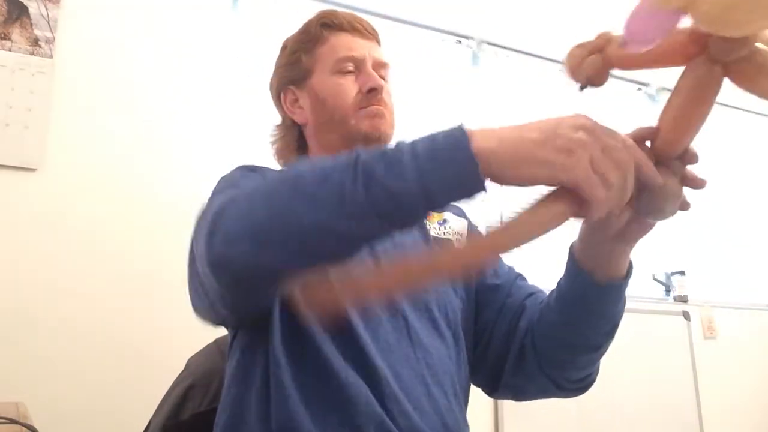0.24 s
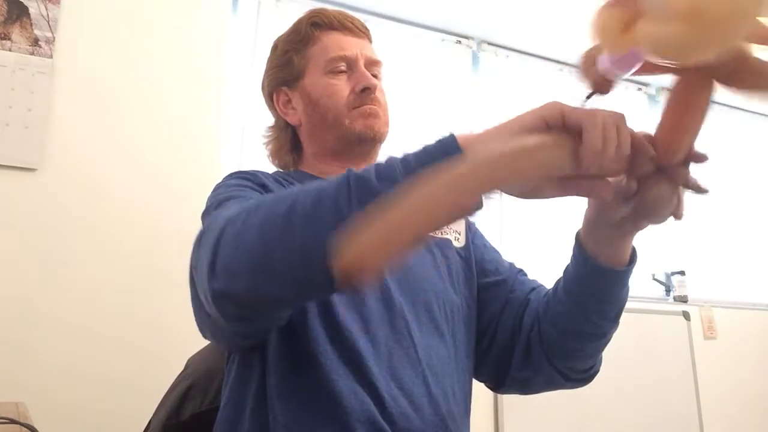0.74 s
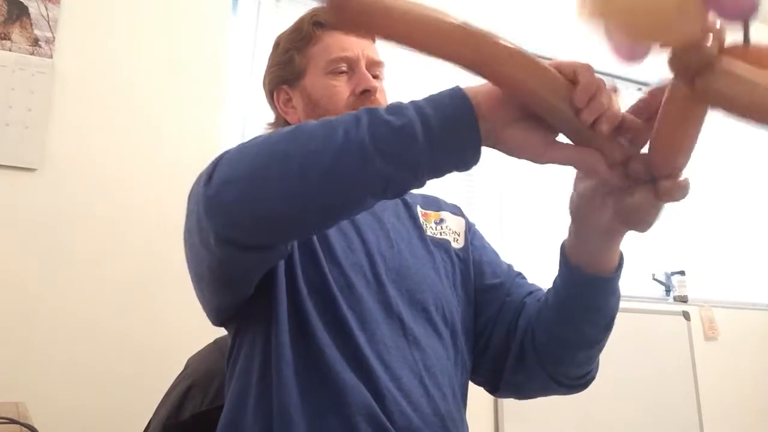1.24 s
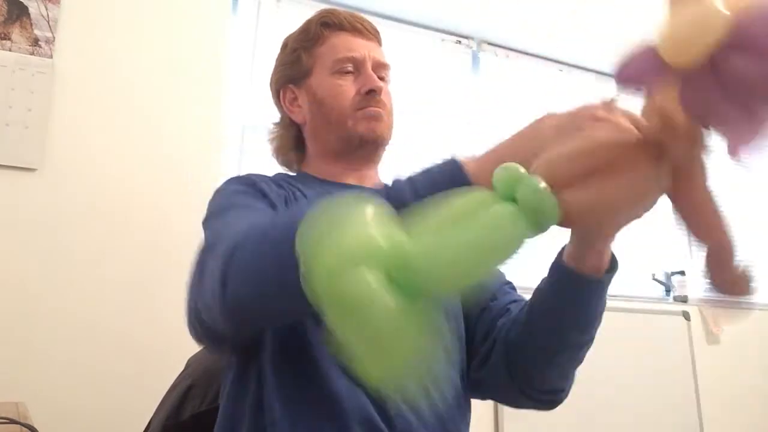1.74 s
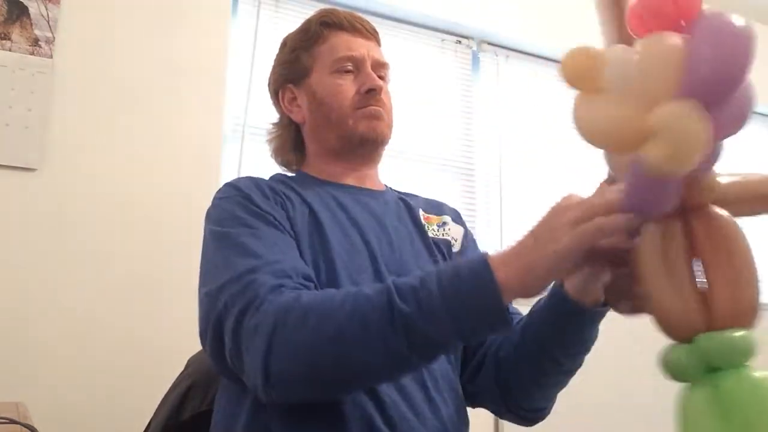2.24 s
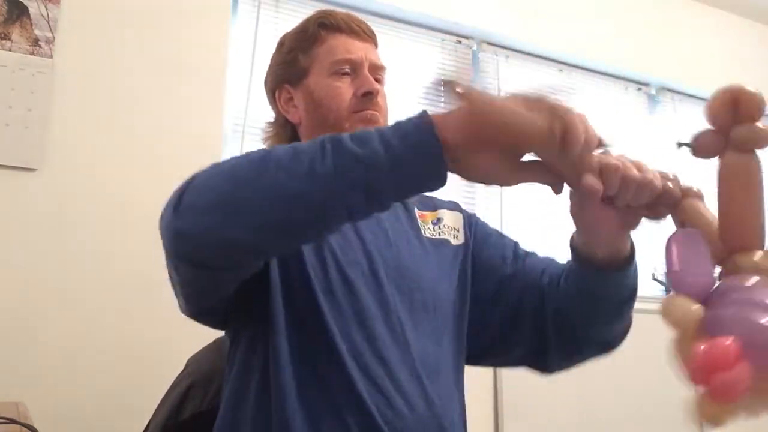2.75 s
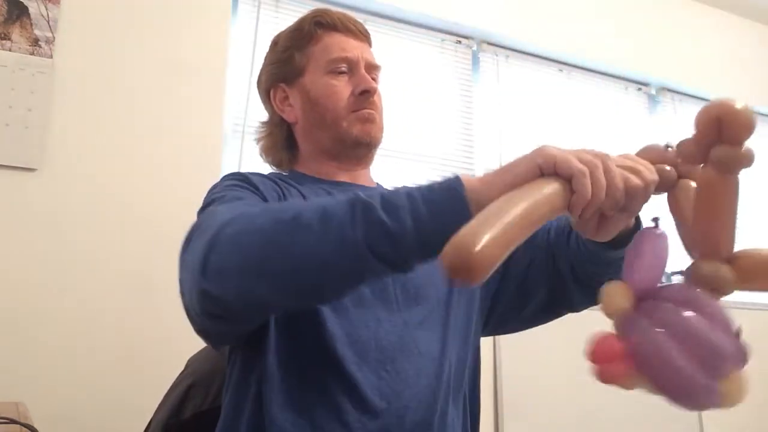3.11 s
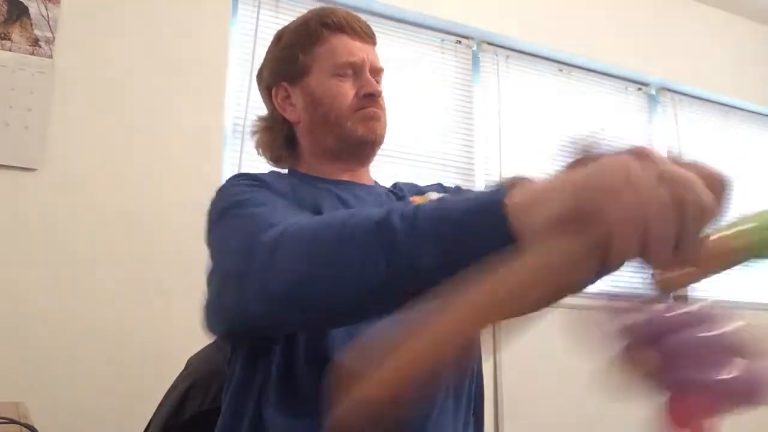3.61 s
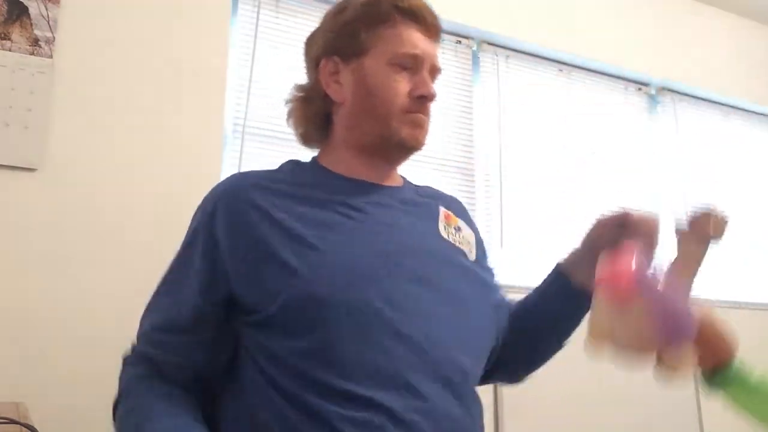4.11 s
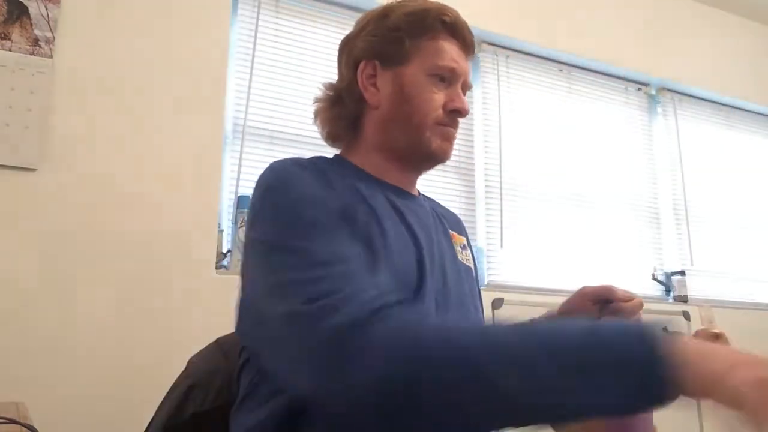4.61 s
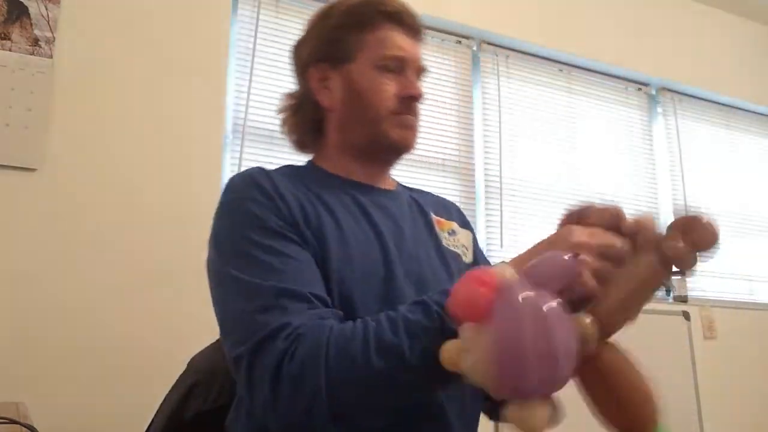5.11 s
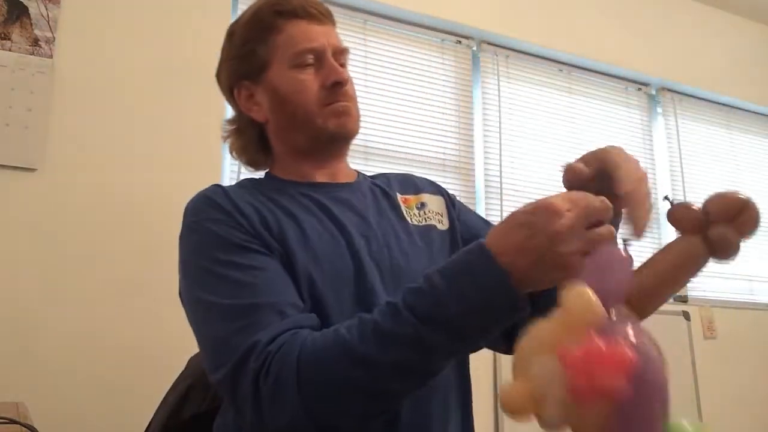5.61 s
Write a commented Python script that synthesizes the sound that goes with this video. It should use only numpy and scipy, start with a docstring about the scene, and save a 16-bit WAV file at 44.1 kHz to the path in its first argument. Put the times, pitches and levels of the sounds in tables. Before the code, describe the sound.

Balloon twisting heard by a nearby microphone indoors: gritty, hissing hand strokes with tiny clicks and dull air-filled knocks, strongest around one and two seconds. Past the middle come a sharp snap, a quick falling squeal, a heavy thump and a rough rubbery squawk, all ringing briefly in the room. Quiet rubs, ticks and one short croak finish it over faint room noise.

```python
"""In a small, bare room, long latex balloons are twisted by hand.
Skin on latex makes dense tiny slips that ring the balloons, with ticks, squeaks and hollow bumps between.
Stretched latex snaps in short noise bursts, and a taut neck squeals downward as a falling near-sine
and lets go with a thump. Then balloon grips balloon: a slip in every cycle makes
a rough squawk and, at the end, short croaks."""
import sys
import numpy as np
from scipy import signal
from scipy.fft import rfft, irfft
from scipy.io import wavfile

SR = 44100
rng = np.random.default_rng(int(sys.argv[2]) if len(sys.argv) > 2 else 0)


def inscribe(sig):
    """Save sig as 16-bit PCM at rate SR to the path in sys.argv[1].

    A 1-D sig is mono; a 2-D sig holds one channel per row.
    Samples are clipped to [-1, 1] before scaling.
    """
    pcm = np.round(np.clip(np.atleast_2d(sig).T, -1, 1) * 32767)
    wavfile.write(sys.argv[1], SR, pcm.astype(np.int16))


N = 258426
TIME = np.arange(N) / SR
TOP_HZ = 15600  # the microphone hears nothing above this

# colour of the hiss of sliding latex: f/Hz, level/dB
HISS_COLOUR = [(2500, -20), (4500, -0.5), (6000, -5.5), (8000, -4.5), (11000, -4.5), (15500, -13.5)]


def undb(db):
    """Turn decibels into a gain."""
    return 10 ** (np.asarray(db) / 20)


def unit(x):
    """Scale a sound to an rms of 1."""
    return x / np.sqrt(np.mean(x ** 2) + 1e-20)


def add(out, s, x):
    """Mix a short sound in at time s (seconds)."""
    i = max(int(s * SR), 0)
    out[i:i + len(x)] += x[:max(N - i, 0)]


def at_hz(points, hz):
    """Read a table between its points, on a log-frequency axis."""
    f, v = np.transpose(points)
    return np.interp(np.log(hz + 1), np.log(f), v)


def ring(x, response):
    """Pass a sound through an impulse response."""
    return signal.fftconvolve(x, response)[:len(x)]


def colour(points, size=2048):
    """Make a minimum-phase response of unit energy with the given spectrum."""
    log_gain = np.log(undb(at_hz(points, np.fft.rfftfreq(size, 1 / SR))))
    cepstrum = irfft(log_gain)
    # folding the cepstrum forward in time makes the response causal
    cepstrum[1:size // 2] *= 2
    cepstrum[size // 2 + 1:] = 0
    h = irfft(np.exp(rfft(cepstrum)))
    return h / np.linalg.norm(h)


def band(x, hz, width):
    """Two-pole band-pass with a gain of 1 at its centre."""
    g = np.tan(np.pi * min(hz, TOP_HZ) / SR)
    k = width / hz
    top = [g * k, 0, -g * k]
    bottom = [1 + g * k + g * g, 2 * g * g - 2, 1 - g * k + g * g]
    return signal.lfilter(top, bottom, x)


def fade(t60):
    """Exponential decay that reaches -60 dB after t60 seconds."""
    t = np.arange(int(t60 * SR) + 8) / SR
    return np.exp(-np.log(1000) * t / t60)


def envelope(s, length, attack, release):
    """Rise from time s, hold until the length is over, then die away."""
    rise = np.clip((TIME - s) / attack, 0, 1)
    return rise * np.exp(-np.clip((TIME - s - length) / release, 0, 30))


def walk(rate):
    """Random wandering of rms 1, with a new target rate times a second."""
    return unit(np.interp(TIME * rate, np.arange(N), rng.standard_normal(N)))


def mode(hz, t60):
    """One damped vibration, with a soft start over its first cycle or so."""
    decay = fade(t60)
    cycles = hz * np.arange(len(decay)) / SR
    return decay * np.sin(2 * np.pi * cycles) * (1 - np.exp(-2 * cycles))


def crack(noise, t60, hz, width):
    """One sudden slip: a step of the skin and a fast-dying flutter; peak 1."""
    decay = fade(t60)[:len(noise)]
    push = noise[:len(decay)] * decay
    push[0] = 5.73  # the step
    x = band(push, hz, width)
    return x / np.abs(x).max()


def background():
    """The quiet of the room as coloured noise, with a faint low hum that comes and goes."""
    # f/Hz, level/dB
    quiet_colour = [(25, -9.5), (60, -8.5), (120, -8.5), (180, -10.5), (500, -15), (1500, -22.5),
                    (5000, -21), (15000, -29.5)]
    swell = undb(-63) * envelope(.15, .73, attack=.1, release=.1)
    hum = unit(band(band(rng.standard_normal(N), 107.6, 8.8), 107.6, 8.8))
    quiet = ring(rng.standard_normal(N), colour(quiet_colour))
    return undb(-60) * quiet + swell * hum


def hand_strokes():
    """Gains of rasp, hollow body and hiss: each stroke rises, holds and fades as the pressure wavers."""
    # strokes of a hand over latex, before the pressure and the trims of the rubbing:
    # start t/s, length t/s, rasp level/dB, hollow body level/dB re rasp, hiss level/dB re rasp
    strokes = [(0, 0.14, -52.5, -2, -1.5), (0.164, 0.25, -51, -8.5, -3), (0.442, 0.22, -53.5, -3.5, -2),
               (0.57, 0.094, -49, -10, -2.5), (0.663, 0.048, -41, -16, -10), (0.726, .17, -49, -11.5, -4),
               (0.915, 0.068, -40, -17, -3.5), (0.99, .14, -41, -6, -3), (1.155, 0.16, -53.5, -2, -1.5),
               (1.38, 0.24, -48.5, -1, -3), (1.566, 0.38, -44.5, -3.5, -6), (1.982, .045, -36.5, -3, -11),
               (2.027, 0.3, -45.5, -7, -4.5), (2.238, 0.25, -45, -7, -4.5), (2.491, 0.13, -58, -2.5, -2),
               (2.76, 0.16, -49, -10, -3.5), (2.852, 0.16, -47, -9.5, -6), (3.046, 0.2, -55, -17, -2),
               (3.256, 0.13, -55.5, -17, -6), (4, 0.39, -52.5, 0.5, -2), (4.59, 0.22, -52.5, -20, -8.5),
               (4.781, 0.31, -51.5, -17, -12.5), (5.129, .1, -50.5, 1.5, -10),
               (5.263, 0.3, -49.5, -7.5, -12), (5.644, .14, -57, -4.5, -9), (5.827, .04, -46, -9, -11)]
    gains = np.zeros((3, N))
    for s, length, db, hollow_db, hiss_db in strokes:
        stroke = undb(db) * envelope(s, length, attack=.04, release=.026)
        gains = np.maximum(gains, np.outer(undb([0, hollow_db, hiss_db]), stroke))
    pressure_db = 1.26 * walk(16)
    return gains * undb(pressure_db)


def micro_slips(rate, spread_db):
    """A dense stream of tiny slips, rate a second, a few of them much larger than the rest."""
    sizes = undb(spread_db * np.minimum(rng.exponential(size=N), 5))
    slips_now = rng.random(N) < rate / SR
    return unit(slips_now * sizes * rng.standard_normal(N))


def catches(count, low_hz, high_hz, cycles, weak_db):
    """Brief catches of skin on latex, each a short damped vibration at a pitch of its own."""
    out = np.zeros(N)
    for when, pitch, life, size in rng.random((count, 4)):
        hz = low_hz * (high_hz / low_hz) ** pitch
        gain = undb(weak_db * np.log(size + 0.037))  # some catches are much weaker
        add(out, when * N / SR, gain * mode(hz, cycles * (0.16 + life) / hz))
    return unit(out)


def rubbing(rasp_gain, hollow_gain, hiss_gain):
    """Hands drag over latex in uneven steps: the skin rasps, catches and hisses, the air inside answers."""
    # colours of the skin's rasp and of the air inside: f/Hz, level/dB
    rasp_colour = [(260, -33), (450, -3), (808, -9), (928, 1.5), (1030, -6), (1740, 1.5), (1980, -0.5),
                   (2890, -4), (3170, -0.5), (7000, -18.5), (9100, -39), (15400, -120)]
    hollow_colour = [(40, -23), (100, -3), (170, -6), (290, 6), (450, -1.5), (600, -2), (900, -33),
                     (2000, -82.5)]
    grip = unit(undb(1.9 * walk(55) + 1.27 * walk(300)))
    slips = grip * micro_slips(rate=4000, spread_db=2.5)
    grains = grip * catches(count=3000, low_hz=650, high_hz=4700, cycles=34, weak_db=2.5)
    rasp = unit(ring(slips, colour(rasp_colour)) + undb(-6.0) * grains)
    hollow = ring(slips, colour(hollow_colour))
    hiss = ring(grip * micro_slips(rate=14000, spread_db=1.3), colour(HISS_COLOUR))
    return undb(-0.5) * rasp_gain * rasp + undb(-3.0) * hollow_gain * hollow + undb(0.55) * hiss_gain * hiss


def ticks(rasp_gain):
    """Single small slips as the grip shifts; random fainter ones follow the strength of the rubbing."""
    # the clearest slips: t/s, peak level/dB, centre f/Hz
    clear_slips = [(.002, -26.5, 625), (0.019, -28.5, 563), (.087, -25.5, 750), (.185, -27.5, 680),
                   (0.256, -35, 3150), (.295, -29, 2320), (.351, -29, 2430), (.492, -32, 1460),
                   (.663, -28, 2190), (.686, -25, 2030), (0.702, -24, 1980), (0.924, -25.5, 2960),
                   (1.129, -24.5, 500), (1.359, -34, 570), (1.54, -27.5, 950), (2.571, -32.5, 1140),
                   (2.789, -32, 11000), (4.157, -25, 3280), (4.791, -35, 1870), (5.03, -29, 860),
                   (5.297, -30.5, 1400), (5.359, -35, 1840), (5.371, -27, 537), (5.817, -33, 700)]
    t60_s = 0.035
    strays_per_s, stray_db = 33, 13.5  # highest peak re the rasp gain
    low_hz, high_hz = 500, 3200
    out, strays = np.zeros(N), np.zeros(N)
    for s, db, hz in clear_slips:
        add(out, s, undb(db) * crack(rng.standard_normal(4096), t60_s, hz, 1.86 * hz))
    for when, pitch, size in rng.random((int(strays_per_s * N / SR), 3)):
        hz = low_hz * (high_hz / low_hz) ** pitch
        slip = crack(rng.standard_normal(4096), t60_s, hz, 1.5 * hz)
        add(strays, when * N / SR, np.sqrt(size) * slip)
    return out + undb(stray_db) * rasp_gain * strays


def snaps():
    """Stretched latex lets go; returns the direct crack and the sharp pulse thrown into the room."""
    # t/s, peak level/dB, crack t60 t/s, centre f/Hz, width f/Hz, room pulse level/dB re the crack's rms
    releases = [(0.0752, -19.5, 0.0082, 3000, 9000, -18), (0.947, -15, 0.0063, 10800, 8000, -18),
                (1.994, -26, 0.021, 3500, 8000, 2), (2.78, -20, 0.015, 8400, 9100, -3),
                (3.6306, -2.5, .012, 6500, 14000, 11), (3.9059, -3.5, 0.061, 2460, 7040, 0.5),
                (4.2768, -7, 0.034, 1900, 3900, 1), (4.2949, -11, 0.037, 1190, 3000, 4),
                (5.503, -9.5, 0.027, 760, 1000, -10.5), (5.507, -17, 0.095, 7260, 9000, -0.5)]
    direct, thrown = np.zeros(N), np.zeros(N)
    for s, db, t60, hz, width, room_db in releases:
        x = undb(db) * crack(rng.standard_normal(4096), t60, hz, width)
        pulse = band(signal.unit_impulse(len(x)), hz, width)
        add(direct, s, x)
        add(thrown, s, undb(room_db) * np.std(x) * unit(pulse))
    return direct, thrown


def knock(hz, t60):
    """A nudged balloon rings in a few quickly damped modes."""
    # frequency as a multiple of hz, level/dB, share of the t60
    balloon_modes = [(0.998, -3, 0.9), (1.52, -4.5, 0.49), (2.302, -12, 0.77), (3.6, -9, 0.43)]
    out = np.zeros(int(2 * t60 * SR) + 8)
    for ratio, db, life in balloon_modes:
        x = undb(db) * mode(hz * ratio, t60 * life)[:len(out)]
        out[:len(x)] += x
    return out


def bumps(hollow_gain):
    """Clear bumps and thumps of the balloons, some of them ringing on after a snap or as the neck lets go, and
    random nudges that follow the strength of the rubbing."""
    # t/s, level/dB of the whole knock, base f/Hz of its modes, ring t60 t/s
    clear_bumps = [(0.076, -38, 101, .031), (.135, -43, 305, .25), (.187, -38, 305, 0.071),
                   (1.045, -38, 391, 0.14), (1.128, -32, 350, 0.056), (1.362, -33, 111, 0.036),
                   (1.818, -33, 210, 0.057), (2.002, -33, 274, 0.13), (2.751, -19.5, 327, 0.015),
                   (2.783, -37.5, 205, .1), (3.632, -15, 127, 0.018), (3.668, -37, 258, 0.22),
                   (3.9033, -7, 261, 0.032), (3.906, -25, 115, .17), (3.916, -10, 452, 0.016),
                   (3.946, -26, 325, .069), (4.03, -22.5, 159, 0.028), (4.035, -20, 476, 0.023),
                   (4.082, -31.5, 443, 0.053), (4.188, -35.5, 500, .079), (4.288, -10.5, 320, 0.082),
                   (4.297, -15.5, 432, 0.051), (4.301, -33, 88, 0.27), (5.174, -30, 222, 0.051),
                   (5.181, -29.5, 67, 0.09), (5.502, -17.5, 619, 0.079)]
    nudges_per_s, nudge_db, nudge_t60_s = 14, 5, 0.079  # highest level re the hollow body gain
    low_hz, high_hz = 170, 530
    out, nudges = np.zeros(N), np.zeros(N)
    for s, db, hz, t60 in clear_bumps:
        add(out, s, undb(db) * knock(hz, t60))
    for when, pitch, size in rng.random((int(nudges_per_s * N / SR), 3)):
        hz = low_hz * (high_hz / low_hz) ** pitch
        add(nudges, when * N / SR, np.sqrt(size) * knock(hz, nudge_t60_s))
    return out + undb(nudge_db) * hollow_gain * nudges


def chirps():
    """Short squeaks under a fingertip; the rough ones stutter and waver."""
    # start t/s, length t/s, start f/Hz, end f/Hz, level/dB before the swell, roughness (0 = steady)
    squeaks = [(0.413, 0.068, 1194, 1322, -53.5, 0.54), (2.857, 0.071, 1548, 1714, -47.5, 0.89),
               (3.091, 0.044, 753, 1115, -51.5, 0.77), (3.3, .054, 1850, 1905, -58.5, 0.2),
               (3.607, 0.021, 5200, 5400, -47, 1.2), (4.157, 0.0085, 3310, 3200, -36.5, .4),
               (4.236, 0.059, 805, 874, -39.5, 0.8), (4.789, .048, 1810, 1720, -43, 0.6),
               (4.876, 0.014, 7020, 6940, -48, .03), (5.029, 0.018, 1096, 756, -39.5, 1.1),
               (5.466, .0325, 1527, 1090, -39, 0.87), (5.59, .06, 900, 1020, -49, .7)]
    out, waver, stutter = np.zeros(N), walk(900), walk(450)
    for s, length, start_hz, end_hz, db, rough in squeaks:
        u = np.linspace(0, 1, int(length * SR))  # progress through the squeak
        now = int(s * SR) + np.arange(len(u))
        hz = start_hz * (end_hz / start_hz) ** u * np.exp(0.108 * rough * waver[now])
        phase = 2 * np.pi * np.cumsum(hz) / SR
        tone = np.sin(phase) + undb(-20) * np.sin(2 * phase)
        tone = (1 - rough + rough * stutter[now]) * tone
        swell = np.sqrt(4 * u * (1 - u))
        add(out, s, undb(db) * swell * unit(tone))
    return out


def squeal():
    """The taut neck vibrates almost as a sine; its pitch drops ever faster as it slides free."""
    start_s, length_s, stop_s = 3.833, .073, 0.0038  # it falls silent just before the neck lets go
    start_hz, fall_hz, fall_power = 6610, 2430, 2.4
    # it starts swell_db softer and is at full level once the pitch has dropped by swell_fall_hz
    full_db, swell_db, swell_fall_hz = -11.5, 19, 1230
    fall = fall_hz * np.clip((TIME - start_s) / length_s, 0, 1) ** fall_power
    hz = start_hz - fall
    db = full_db - swell_db * np.maximum(1 - fall / swell_fall_hz, 0)
    phase = 2 * np.pi * np.cumsum(hz * (1 + 0.0074 * walk(1500))) / SR
    overtones = np.sin(2 * phase) + undb(-6) * np.sin(3 * phase) * (3 * hz < SR / 2)
    flutter = undb(1.8 * walk(400))
    gate = envelope(start_s, length_s - stop_s, attack=0.0026, release=stop_s / 2)
    hiss = undb(-21) * ring(rng.standard_normal(N), colour(HISS_COLOUR))  # the sliding neck hisses too
    return gate * undb(db) * flutter * (np.sin(phase) + undb(-7.5) * overtones + hiss)


def slide(strokes):
    """Slip rate, gain and roughness of strokes that catch hard, settle, swell and let go."""
    settle_s, catch_s, catch_rough = .026, 0.019, .88
    hz, gain, rough = np.full(N, 1. * strokes[0][2]), np.zeros(N), np.zeros(N)
    for s, length, first_hz, settled_hz, db, swell_db, catch_db, settled_rough in strokes:
        age = np.clip(TIME - s, 0, length)
        unsettled = np.exp(-age / settle_s)
        hz = np.where(TIME >= s, settled_hz + (first_hz - settled_hz) * unsettled, hz)
        rough = np.where(TIME >= s, settled_rough + (catch_rough - settled_rough) * unsettled, rough)
        effort_db = db + swell_db * age / length + catch_db * np.exp(-age / catch_s)
        gain += undb(effort_db) * envelope(s, length, attack=0.0016, release=.002)
    return hz, gain, np.clip(rough, 0, 1)


def stick_slip(hz, gain, rough, spectrum, jitter, scatter_db, limp_db, scrape_db):
    """Latex sticks and lets go once a cycle; rough strokes slip unevenly, and each slip scrapes."""
    step = hz * np.exp(jitter * rough * walk(600)) / SR
    phase = np.cumsum(step)
    i = np.flatnonzero(np.diff(np.floor(phase))) + 1  # samples where a new cycle has begun
    late = phase[i] % 1 / step[i]
    limp = limp_db * (-1) ** np.arange(len(i))  # strong and weak slips alternate
    scatter = scatter_db * (rough[i] + .5) * rng.standard_normal(len(i))
    sizes = undb(limp + scatter) / np.sqrt(step[i])
    # share each slip between two samples, so that it can fall between them
    pulses = np.zeros(N)
    pulses[i - 1] += sizes * late
    pulses[i] += sizes * (1 - late)
    scrape = unit(np.exp(-(phase % 1) / 0.38) * rng.standard_normal(N))
    return ring(gain * (pulses + undb(scrape_db) * scrape), colour(spectrum))


def squawk():
    """Hard strokes, one of them long, set the balloon's resonances ringing; the harder, the shriller."""
    # start t/s, length t/s, first slip rate f/Hz, settled slip rate f/Hz, base level/dB,
    # swell level/dB by the end, extra level/dB at the catch, settled roughness (0-1)
    strokes = [(4.2565, .005, 700.8, 650, -30.5, -2.5, 1.5, .73),
               (4.2772, .116, 700, 537.5, -25.5, 8.5, 6.5, .1),
               (4.48, 0.0124, 591, 756.5, -32.5, 4.5, 2.5, .6)]
    # f/Hz, level/dB
    spectrum = [(88, -88), (150, -22), (302, -11.5), (445, -8.5), (540, -12.5), (595, -6), (877, -2.5),
                (1090, -5.5), (1370, -3), (1570, -7.5), (1940, -6.5), (2140, -8.5), (3410, -10.5),
                (5990, -11), (15500, -24.5)]
    # resonances of air and skin: f/Hz, width f/Hz, level/dB
    resonances = [(299, 18, 8.5), (531, 20, 1), (1096, 36, 2.5), (1606, 51, -2), (3660, 99, -2),
                  (4820, 140, -13), (5200, 99, -17)]
    slip_hz, force, rough = slide(strokes)
    x = stick_slip(slip_hz, force, rough, spectrum, jitter=.22, scatter_db=3.0, limp_db=1.7, scrape_db=-7.0)
    # the curved skin spreads each slip in time: all-pass filters
    for hz, width in [(1400, 300), (2500, 950), (4300, 1700), (5600, 870), (7500, 2700)]:
        x = x - 2 * band(x, hz, width)
    effort = force / force.max()
    # the sliding contact favours now one part of the skin, now another
    for hz, width, gain in [(2530, 690, .15), (4700, 1400, 0.37), (6700, 3300, 0.41)]:
        x = x + effort * (gain + .5 * walk(90)) * band(x, hz, width)
    return x + sum(undb(db) * band(x, hz, width) for hz, width, db in resonances)


def croak():
    """Balloon grips balloon in short rough strokes, with one slip in every cycle."""
    # start t/s, length t/s, first slip rate f/Hz, settled slip rate f/Hz, base level/dB,
    # swell level/dB by the end, extra level/dB at the catch, settled roughness (0-1)
    strokes = [(5.466, .036, 754, 600, -50.5, 18, 3, .64),
               (5.503, 0.0674, 755.5, 827, -35.5, -2.5, 10.5, .78)]
    # f/Hz, level/dB
    spectrum = [(88, -58), (150, -22), (193, -2), (352, -7), (631, -1), (844, -5.5), (930, 4.5),
                (1980, -18.5), (2360, -4), (5330, -20), (8830, -19), (15500, -27)]
    return stick_slip(*slide(strokes), spectrum, jitter=.3, scatter_db=2.0, limp_db=1.0, scrape_db=-4.5)


def room_response():
    """A few early reflections and a dense tail, each octave fading at its own pace; unit energy."""
    # reverberation: f/Hz, t60 t/s
    room_t60 = [(100, 0.34), (400, 0.49), (1500, 0.44), (5000, 0.38), (10000, 0.38), (15000, 0.35)]
    # nearby walls and furniture: delay t/s, level/dB re a tail of unit energy
    reflections = [(.0036, -19), (.0083, -20), (0.0095, -17), (0.015, -22), (0.0208, -19)]
    t = np.arange(SR * 3 // 5) / SR
    noise = rfft(rng.standard_normal(len(t)))
    hz = np.fft.rfftfreq(len(t), 1 / SR)
    octave = np.round(np.log2(np.maximum(hz, 64)))
    tail = np.zeros(len(t))
    for k in np.unique(octave):
        decay = undb(-60 * t / at_hz(room_t60, 2 ** k))
        tail += irfft(noise * (octave == k), len(t)) * decay
    tail = tail * np.minimum(t / 0.0099, 1) ** 2  # the tail builds up gradually
    tail = tail / np.linalg.norm(tail)
    for s, db in reflections:
        tail[int(s * SR)] += undb(db)
    return tail / np.linalg.norm(tail)


def scene():
    """Mix all the sounds, each with its own share of the room's reverberation."""
    rasp_gain, hollow_gain, hiss_gain = hand_strokes()
    rub = rubbing(rasp_gain, hollow_gain, hiss_gain)
    tick, bump = ticks(rasp_gain), bumps(hollow_gain)
    snap, thrown = snaps()
    finger, neck = chirps(), squeal()
    stroke, last = undb(-4) * squawk(), croak()
    direct = rub + tick + bump + neck + stroke + last + finger + snap
    # what each source sends into the room
    thrown = thrown + undb(-7.5) * rub + undb(-4) * tick + undb(-13.0) * bump + undb(-4.0) * finger
    thrown = thrown + neck + undb(-5.0) * stroke + undb(-12.0) * last
    return (direct + ring(thrown, room_response()) + background())[None]


def record(dry):
    """The microphone loses the deepest bass and the top."""
    x = signal.sosfilt(signal.butter(2, 45, "high", fs=SR, output="sos"), dry)
    return signal.sosfilt(signal.ellip(10, .2, 80, TOP_HZ, fs=SR, output="sos"), x)


dry = scene()
out = record(dry)
inscribe(out)
```